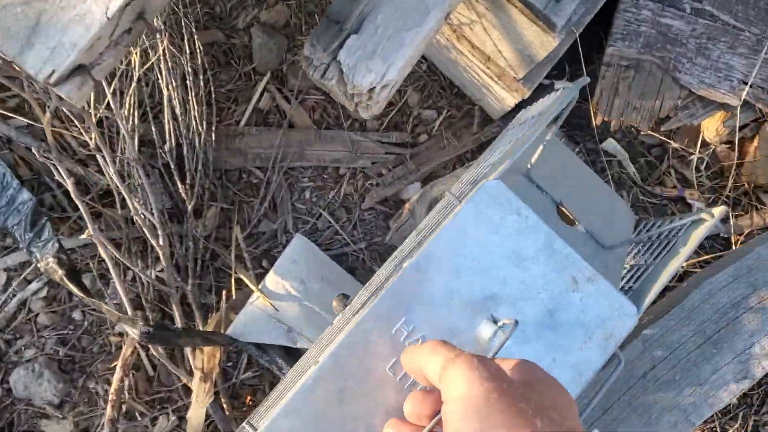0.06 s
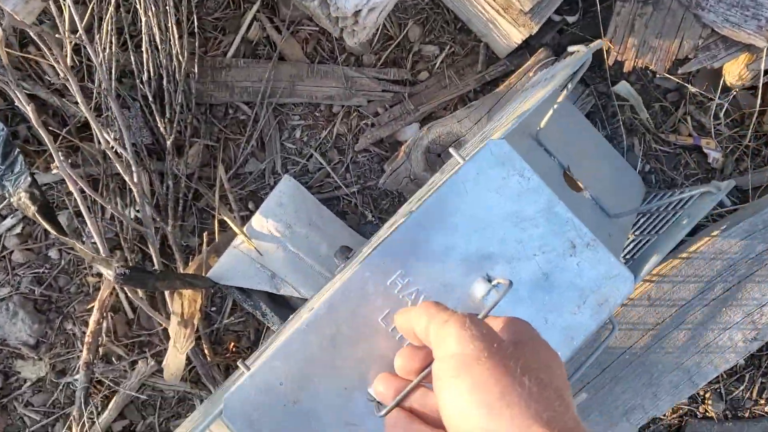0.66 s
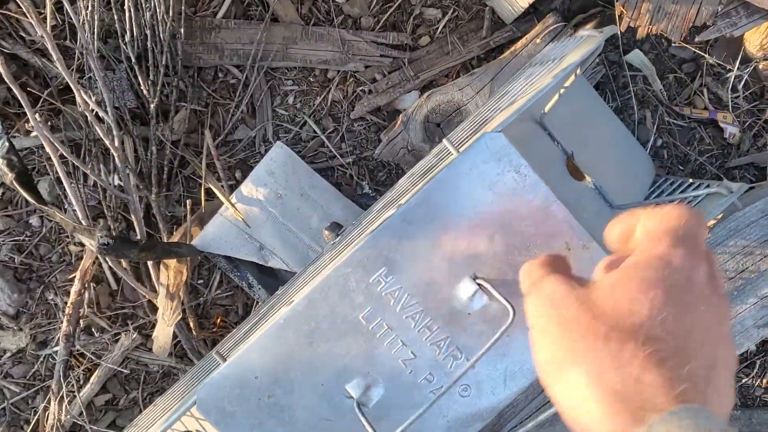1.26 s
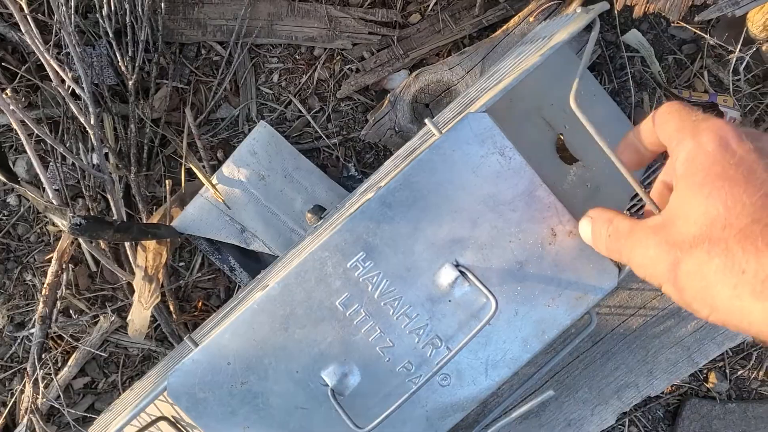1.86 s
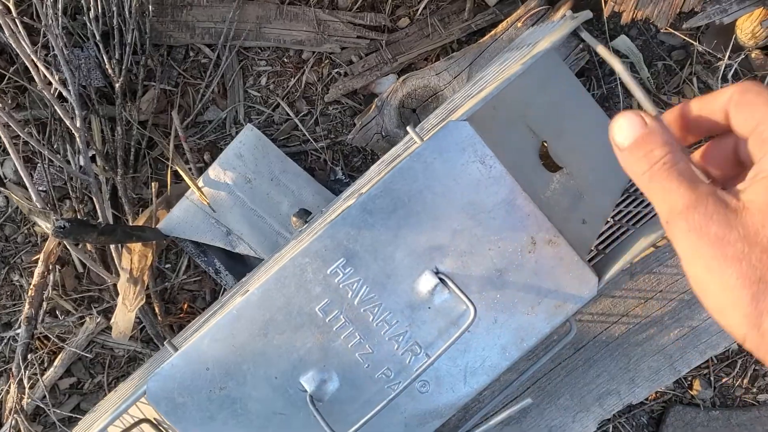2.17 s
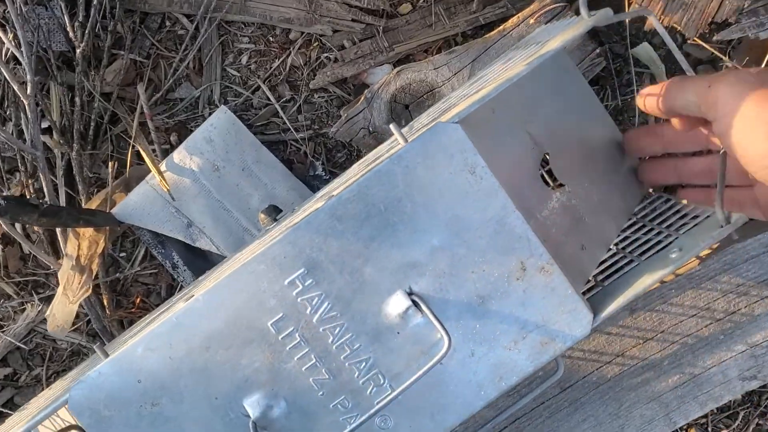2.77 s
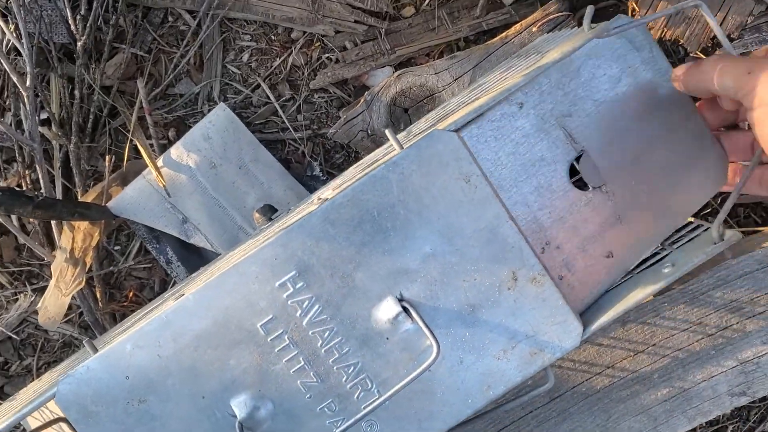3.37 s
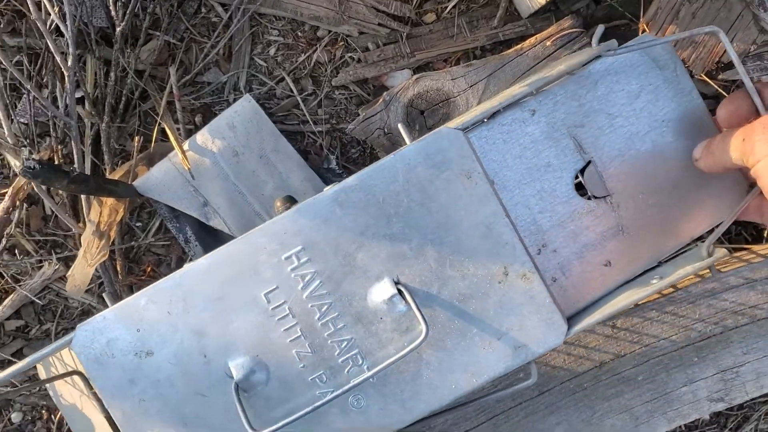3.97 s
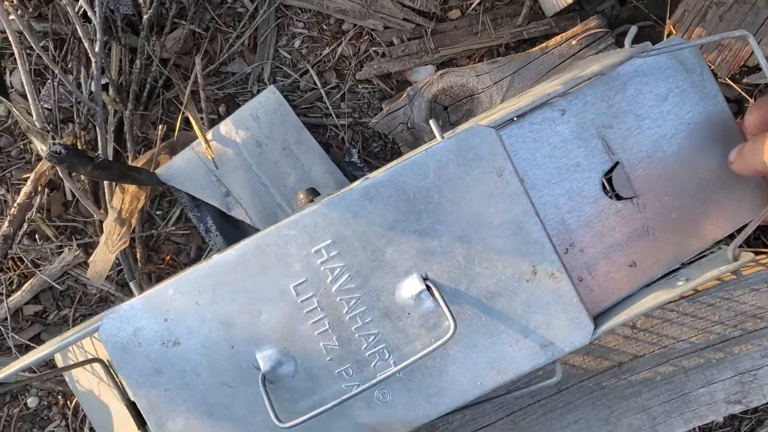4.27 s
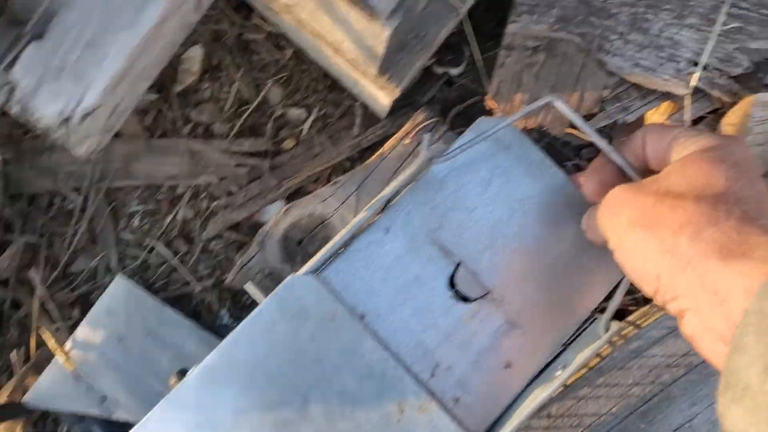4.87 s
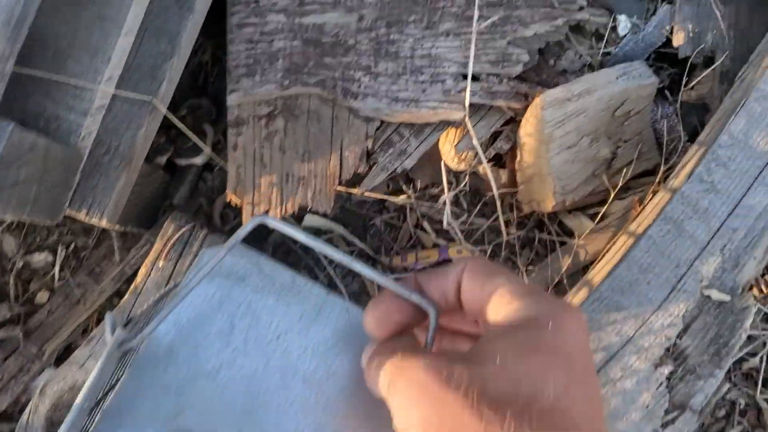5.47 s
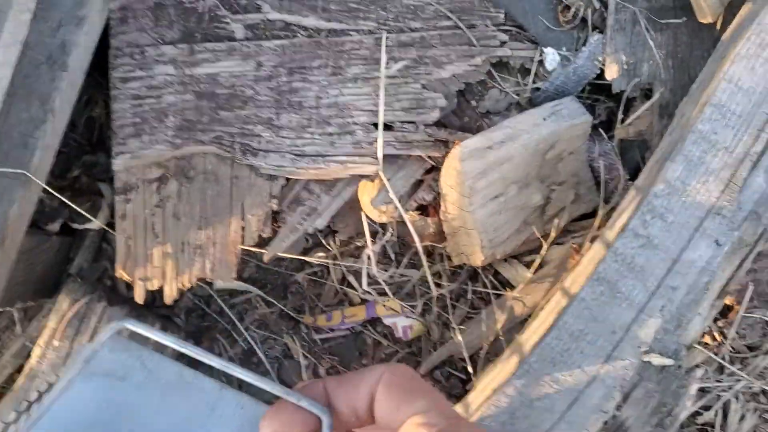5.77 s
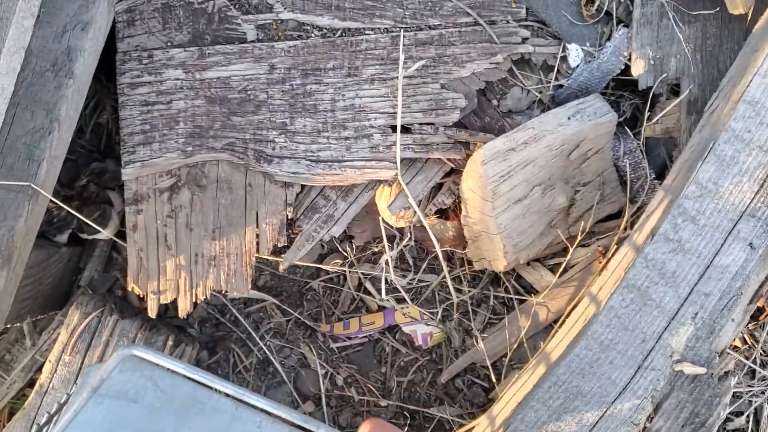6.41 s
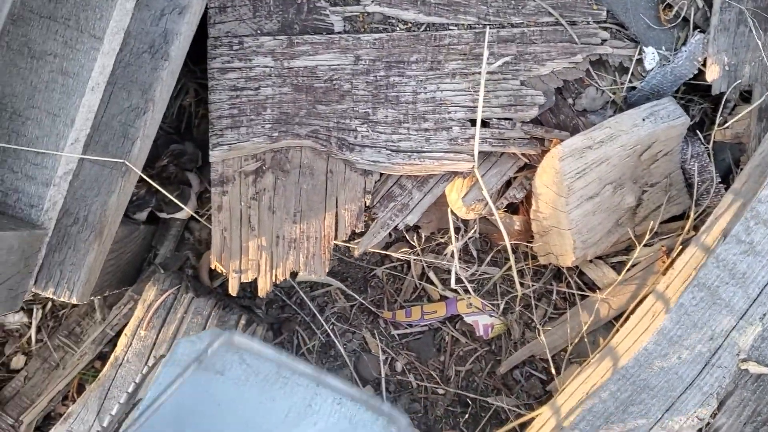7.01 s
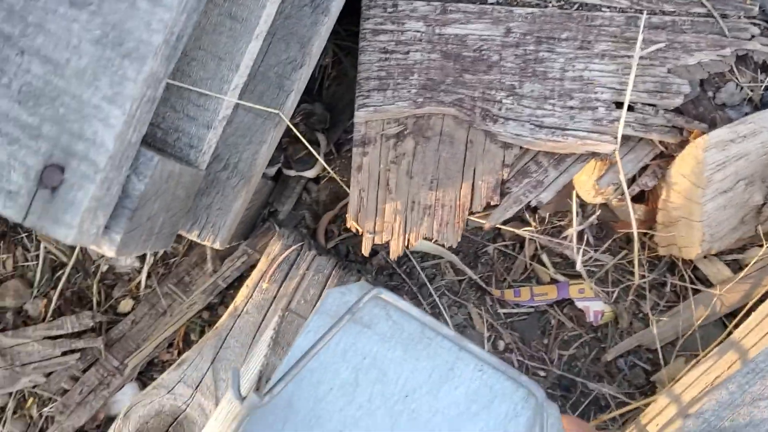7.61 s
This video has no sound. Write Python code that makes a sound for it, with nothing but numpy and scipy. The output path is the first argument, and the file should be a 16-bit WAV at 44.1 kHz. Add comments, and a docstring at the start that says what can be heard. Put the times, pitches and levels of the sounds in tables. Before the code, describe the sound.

Small sheet-metal trap handled outdoors: clinks, taps and wire scrapes, then a brief hinge squeak and a sharp, ringing snap.

```python
"""Outdoors, a phone at arm's length from a galvanized live trap being set by hand, over faint distant rumble.
The carrying handle drops and the sheet-metal box rings. The wire bail knocks, and scrapes by catching and
slipping on the rough zinc; fingers rub along the wire. The door is swung up and latched: near seven seconds
the hinge squeaks and the door snaps, the loudest blow, while a gust buffets the microphone."""
import sys
import numpy as np
from scipy import signal
from scipy.fft import rfft, irfft, next_fast_len
from scipy.io import wavfile

SR = 44100
rng = np.random.default_rng(int(sys.argv[2]) if len(sys.argv) > 2 else 0)


def unload_audio(sound):
    """Save the sound as a 16-bit wav file, at the path given as the first command line argument."""
    columns = np.transpose(np.atleast_2d(sound))
    # keep every value between -1 and 1, then stretch to whole-number steps
    steps = np.round(np.clip(columns, -1, 1) * 32767)
    wavfile.write(sys.argv[1], SR, steps.astype(np.int16))


N = 337365
TIME = np.arange(N) / SR
RING_SIZE = 16384  # samples in one ring of the box
RING_TIME, RING_HZ = np.arange(RING_SIZE) / SR, np.fft.rfftfreq(RING_SIZE, 1 / SR)

# spectrum of the distant rumble: freq_hz, gain_db
RUMBLE_SPECTRUM = [(15, -34.5), (25, -7.5), (64, 6), (117, 2.5), (195, -3.5), (300, -9.5), (420, -5.5),
                   (600, -8), (820, -13.5), (1100, -15.5), (2500, -32.5), (5000, -36.5), (7400, -41.5),
                   (9300, -35), (16000, -43.5)]
# course of the rumble: time_s, level_db
RUMBLE_LEVEL = [(0, -65), (4.5, -59.5), (7.65, -61.5)]
# spectrum of wind on the microphone: freq_hz, gain_db
GUST_SPECTRUM = [(15, -38.5), (25, -15), (52, -1), (88, 0.5), (125, -7), (180, -20.5), (260, -33.5),
                 (400, -33.5), (700, -85)]
# puffs of wind: peak_s, level_db, half_length_s
PUFFS = [(6.074, -48.5, 0.039), (6.858, -36, 0.31), (7.153, -36, 0.16), (7.478, -47, 0.076)]
# fingers rubbing along the wire: start_s, end_s, level_db
FINGER_RUBS = [(1.845, 2.46, -66.5), (4.448, 4.822, -77.5), (5.317, 5.5, -71)]
# spectrum of skin on wire: freq_hz, gain_db
RUB_SPECTRUM = [(2500, -6), (3600, 0), (5200, -3.5), (6700, -1), (7400, -17), (9000, -8), (11000, -28),
                (16000, -3)]
# strokes of metal sliding on metal: start_s, fastest_s, end_s, level_db, hardness_db
STROKES = [(0, 0.05, 0.36, -72, -6), (0.64, 0.87, 0.98, -61, -4), (1.03, 1.06, 1.42, -54, -19),
           (1.6, 1.67, 1.79, -54, -10), (2.37, 2.44, 2.8, -56, -9), (2.72, 2.9, 3.2, -64, -3),
           (3.1, 3.3, 3.6, -58, -2), (3.6, 3.87, 4.2, -53, -11), (4.76, 4.83, 5.08, -57, -18),
           (5.1, 5.35, 5.56, -62, -15), (6.22, 6.85, 7.05, -51, -19), (7.1, 7.21, 7.37, -55, 1),
           (7.33, 7.38, 7.53, -66, -7)]
# spectrum of the dry tick of a zinc grain: freq_hz, gain_db
TICK_SPECTRUM = [(800, -32), (2500, 1), (5500, 1), (7600, -9), (9200, -1), (16000, -6)]
# sharpest snaps of the sliding wire: start_s, level_db
WIRE_SNAPS = [(0.668, -49), (0.69, -52), (0.722, -56), (0.743, -52), (0.77, -60), (2.519, -49),
              (6.875, -45), (6.897, -44), (6.909, -38.5), (7.019, -38)]
# course of the hinge squeak: time_s, pitch_hz, level_db
HINGE_SQUEAK = [(6.965, 888.6, -60), (6.985, 887, -39), (7.003, 804, -35.5), (7.018, 845, -37),
                (7.032, 840, -48)]
# spectrum of the rasp in the hinge: freq_hz, gain_db
RASP_SPECTRUM = [(400, -40), (1100, -6), (2000, -7.5), (4000, -13), (7000, -26.5), (16000, -27)]
# blows that set the bail ringing: start_s, level_db, hardness_db (added to its high modes)
BAIL_BLOWS = [(1.649, -47, -45), (5.239, -57, -26), (5.984, -43, -42), (6.914, -44.5, -30.5),
              (7.036, -26, -1.5)]
# modes of the bail: pitch_hz, gain_db, t60_s
BAIL_TONES = [(1066, -8, .22), (1252, 0, .25), (1916, -17, .25), (2640, -19, .22), (11601, -19, .45),
              (13151, -1, .14), (13385, -13, .17), (14815, -20, .5)]
# the sheet metal's bands (boom, body, clank, sizzle): lower_edge_hz, trim_db, build_up_s, t60_share
BANDS = [(125, -2.5, 0.005, 1.33), (416, -4, 0.006, 1.26), (1620, -4.5, 0.0031, 0.93),
         (5270, -2, 0.002, 0.92)]
# overall voice of the panels: freq_hz, gain_db
PANEL_SPECTRUM = [(130, -6), (205, -4), (300, -2.5), (355, -7), (470, 3.5), (650, 3.5), (1100, 2),
                  (1800, -3), (3400, -4), (5500, -11), (7600, -20.5), (9200, -12.5), (12500, -14.5),
                  (16000, -18.5)]
# panel modes with a set weight: pitch_hz, weight_db
MAIN_MODES = [(160, 0.5), (207, 8.5), (232, -0.5), (462, 6.5), (590, 7.5), (652, 8), (727, 4), (1062, 10.5),
              (1245, 6.5), (1663, 8.5), (2153, -10), (2680, 3), (3030, 4), (3442, 7.5), (4717, -3),
              (9152, 12)]
# the hand holds the door firmly and chokes the ring: start_s, end_s
FIRM_GRIPS = [(2.45, 2.55), (3.3, 3.42), (6.6, 7.0)]
# where the blows lie as the phone turns away from the trap: time_s, left_minus_right_db
TRAP_BEARING = [(0, -1), (6.3, 0.5), (7.0, 1)]
# blows on the trap, with the other bands relative to the body:
# start_s, body_db, boom_db, clank_db, sizzle_db, panel_hz, wire_hz
BLOWS = [(0.227, -53, -3, -12.5, -18.5, 533, 2870), (0.625, -54.5, -6.5, -13, -15.5, 550, 3300),
         (0.666, -74.5, 10, 7, -3, 630, 4670), (0.901, -43, -12.5, -7, -7, 630, 3460),
         (1.071, -32.5, -15, -10, -24.5, 520, 3100), (1.124, -39, -17, -8, -25, 587, 2050),
         (1.142, -38.5, -1, -3.5, -18.5, 462, 3120), (1.168, -30.5, -0.5, -3.5, -18, 554, 3270),
         (1.18, -25.5, -8, -7.5, -22, 605, 2190), (1.198, -33.5, -10, -2, -16, 1090, 3010),
         (1.27, -39, -13, -4.5, -21.5, 510, 3030), (1.295, -45.5, -8, -8, -12, 485, 3070),
         (1.362, -57.5, -5, -10.5, -15, 476, 2990), (1.52, -60.5, 4.5, -19, -17.5, 444, 2940),
         (1.643, -45.5, -5, -14, -11, 1220, 2720), (1.791, -39, -20.5, -6.5, -12.5, 590, 2900),
         (2.185, -48, -30, -16, -30, 610, 3080), (2.2, -53, -25, -0.5, -12, 600, 3600),
         (2.233, -52.5, -5, -10, -17, 620, 2380), (2.461, -37.5, -19, 1.5, -6, 606, 4060),
         (2.485, -41.5, 1, -15, -17, 547, 3430), (2.513, -48, -1, -2, -11, 460, 4100),
         (2.599, -45.5, -22, -7, -20, 630, 3300), (2.641, -42.5, -12.5, -3.5, -16.5, 630, 4000),
         (3.133, -37.5, -6.5, -14, -29, 624, 2630), (3.341, -33, -5, 4.5, -11.5, 1060, 3060),
         (3.353, -31.5, -5.5, -1, -11.5, 1060, 3330), (3.381, -34.5, -18, -1, -17.5, 730, 2950),
         (3.44, -45, -20, 0.5, -14.5, 640, 3230), (3.51, -44, -17, -7.5, -12.5, 636, 3850),
         (3.741, -35, -18, 2, -2, 603, 2690), (3.785, -22.5, -10.5, -1, -3, 764, 3870),
         (3.795, -27.5, -8.5, 2.5, -3, 598, 2670), (3.832, -36, -2, 0, -3.5, 640, 2760),
         (3.91, -40.5, -4.5, 4.5, -1, 507, 2850), (3.934, -39, -6, 2, -8, 475, 2720),
         (3.954, -35.5, -12, -3.5, -6.5, 590, 2880), (4.156, -48.5, -17.5, -14, -29, 586, 2670),
         (4.833, -44, 0.5, -14, -15.5, 582, 2040), (4.85, -42, -10.5, -7.5, -15.5, 627, 1890),
         (5.047, -51.5, -5.5, -5, -16, 1054, 2800), (5.235, -45.5, -11, -18, -24.5, 640, 1920),
         (5.462, -51, -10, -7.5, -14.5, 525, 2500), (5.671, -50.5, -8, -3.5, -16, 655, 3840),
         (5.798, -51, -2.5, -6, -17.5, 805, 4730), (5.981, -42.5, -7, -9.5, -27, 1240, 2710),
         (6.221, -47.5, -16.5, -7, -16, 654, 4500), (6.388, -43, -5, -1.5, -8.5, 813, 3900),
         (6.473, -48.5, -8, -3.5, -6, 584, 3370), (6.558, -46.5, -1, -2, -23, 664, 3900),
         (6.628, -38, -11, 3, -13.5, 810, 4280), (6.76, -40, -5, 3, -10.5, 423, 3670),
         (6.892, -37, -8, -9.5, -10.5, 756, 3400), (6.913, -38, -7, -4.5, -13, 1070, 2260),
         (7.036, -17.5, -17.5, -1, -2.5, 1235, 3960), (7.045, -28.5, -7.5, 5, 3, 1250, 2110),
         (7.089, -47.5, 4.5, 8.5, 7.5, 620, 4300), (7.193, -42.5, -19, 2, -1.5, 715, 3820),
         (7.205, -41, -17, 5.5, 3, 636, 3400), (7.263, -43, -32, 1, -0.5, 640, 4370),
         (7.333, -51, -7, -2, -2.5, 1040, 3450)]


def undb(db):
    """Decibels to gain."""
    return np.exp(np.asarray(db) * (np.log(10) / 20))


def unit(x):
    """Scale to rms 1."""
    return x / np.sqrt(np.mean(x ** 2))


def curves(table):
    """Each column of a table, joined by straight lines in time."""
    times, *columns = np.transpose(table)
    return [np.interp(TIME, times, column) for column in columns]


def colour(spectrum, hz):
    """Gain of a spectrum table at the given frequencies."""
    freq_hz, gain_db = np.transpose(spectrum)
    return undb(np.interp(np.log(hz + 1), np.log(freq_hz), gain_db))


def noise(spectrum):
    """Noise shaped by a spectrum table, rms 1."""
    size = next_fast_len(N)
    shaped = rfft(rng.standard_normal(size)) * colour(spectrum, np.fft.rfftfreq(size, 1 / SR))
    return unit(irfft(shaped, size)[:N])


def wander(rate_hz):
    """Slow random drift around zero."""
    knots = rng.standard_normal(1024)
    return 0.85 * np.interp(TIME * rate_hz, np.arange(len(knots)), knots)


def pan(db):
    """Left and right gains for a level difference."""
    return undb(np.array([db, -db]).reshape(2, -1) / 2)


def add(out, start_s, sound):
    """Mix a sound in at start_s."""
    start = max(int(start_s * SR), 0)
    out[:, start:start + sound.shape[1]] += sound[:, :N - start]


def distant_rumble(side_db=-9, swell_db=1.0):
    """Far-off outdoor rumble, slowly swelling, mostly alike at both microphones."""
    level_db, = curves(RUMBLE_LEVEL)
    mid = noise(RUMBLE_SPECTRUM) * undb(swell_db * wander(4.2))
    side = noise(RUMBLE_SPECTRUM) * undb(side_db)
    return np.array([mid + side, mid - side]) * undb(level_db)


def gust(flutter_db=3, pan_db=-5):
    """Puffs swell and die; their eddies hit each microphone port on its own, the right one harder."""
    strength = sum(undb(db) * np.exp(-((TIME - peak_s) / half_s) ** 2) for peak_s, db, half_s in PUFFS)
    ports = np.array([noise(GUST_SPECTRUM) * undb(flutter_db * wander(16)) for _ in range(2)])
    return ports * strength * pan(pan_db)


def finger_rubs(grain_db=2):
    """Skin slides on the wire: a thin, grainy hiss that swells and fades."""
    speed = sum(undb(db) * np.sin(np.pi * np.clip((TIME - start) / (end - start), 0, 1))
                for start, end, db in FINGER_RUBS)
    hiss = np.array([noise(RUB_SPECTRUM), noise(RUB_SPECTRUM)])
    return hiss * speed * undb(grain_db * wander(68))


def stroke_gains(fade_s=0.017, swell_db=8.5, sink_db=12, hardness_share=0.46):
    """Body, clank and sizzle gains: a stroke grows to its fastest moment, then sinks as the hand slows."""
    gains = np.zeros((3, N))
    for start, fastest, end, db, hardness_db in STROKES:
        edge = np.clip(np.minimum(TIME - start, end - TIME) / fade_s, 0, 1)
        speed = edge * undb(np.interp(TIME, [start, fastest, end], [-swell_db, 0, -sink_db]))
        clank_db = db - 1 + hardness_share * hardness_db
        gains += np.outer(undb([db, clank_db, db + hardness_db]), speed)
    return gains


def zinc_ticks(per_s=32, tick_s=0.0016, gain_db=7, spread_db=4, side_db=-5):
    """Single rough grains snap off the sliding contact, too light to ring the panels."""
    *_, sizzle = stroke_gains()
    snaps = (rng.random(N) < per_s / SR) * sizzle
    snaps *= undb(gain_db + spread_db * np.clip(rng.standard_normal(N), -2, 2))
    for start_s, db in WIRE_SNAPS:
        snaps[int(start_s * SR)] += undb(db)
    decays = signal.lfilter([1], [1, -np.exp(-1 / (tick_s * SR))], snaps)
    mid, side = noise(TICK_SPECTRUM), noise(TICK_SPECTRUM) * undb(side_db)
    return np.array([mid + side, mid - side]) * decays


def hinge_squeak(overtone_db=-16, waver=0.035, rasp_db=-7):
    """Regular stick-slip in the hinge: a short wavering tone, with a rasp once a cycle."""
    pitch_hz, level_db = curves(HINGE_SQUEAK)
    phase = 2 * np.pi * np.cumsum(pitch_hz * (1 + waver * wander(130))) / SR
    tone = sum(undb(overtone_db * k) * np.sin((k + 1) * phase) for k in range(3))
    rasp = noise(RASP_SPECTRUM) * (1 + np.cos(phase)) / 2
    sounding = (TIME > HINGE_SQUEAK[0][0]) & (TIME < HINGE_SQUEAK[-1][0])
    return sounding * undb(level_db) * (tone + undb(rasp_db) * rasp)


def bail_ring(high_hz=6000):
    """The steel rod rings with a few clean tones; only a hard blow wakes the high ones."""
    out = np.zeros((2, N))
    for start_s, db, hardness_db in BAIL_BLOWS:
        for hz, mode_db, t60_s in BAIL_TONES:
            mic_phases = 2 * np.pi * rng.random() + min(hz / 2500, 2) * rng.standard_normal((2, 1))
            fade = undb(db + mode_db + hardness_db * (hz > high_hz) - 60 * RING_TIME / t60_s)
            add(out, start_s, fade * np.sin(2 * np.pi * hz * RING_TIME + mic_phases))
    return out


def panel_modes(spacing_hz=15, between_db=-12, half_lead_s=0.00004):
    """Mode weights by band, microphone and frequency; a thin plate has about equally many per hertz."""
    is_mode = rng.random(len(RING_HZ)) < RING_HZ[1] / spacing_hz
    weight = np.where(is_mode, 1., undb(between_db))
    for hz, db in MAIN_MODES:
        weight[int(round(hz / RING_HZ[1]))] = undb(db - 0.5)
    # short waves leave from all over the box and reach the microphones out of step; the right is nearer
    scatter_rad = np.minimum(RING_HZ / 2000, 1) ** 1.5
    skew_rad = scatter_rad * rng.standard_normal(len(RING_HZ)) - np.pi * RING_HZ * half_lead_s
    mic_phases = np.exp(1j * np.array([skew_rad, -skew_rad]))
    highpasses = [1 / (1 + (edge_hz / (RING_HZ + 1)) ** 12) for edge_hz, *_ in BANDS]
    bandpasses = -np.diff(highpasses, axis=0, append=0)
    return bandpasses[:, None] * weight * colour(PANEL_SPECTRUM, RING_HZ) * mic_phases


def favour(hz, width, db):
    """Extra weight for the modes around one note; width is a share of its frequency."""
    return 1 + (undb(db) - 1) / (1 + ((RING_HZ / hz - 1) / width) ** 2)


def box_ring(modes, t60_s, notes, uneven_db=3.5, cluster_db=1.5, cluster_hz=170):
    """The ring of one contact point, by band: each spot weights single modes and clusters its own way."""
    single, cluster = rng.standard_normal((2, len(RING_HZ)))
    cluster = np.interp(RING_HZ / cluster_hz, np.arange(len(cluster)), cluster)
    spot = notes * undb(uneven_db * single + cluster_db * cluster)
    phases = np.exp(2j * np.pi * rng.random(len(RING_HZ)))
    waves = irfft(modes * spot * phases)
    onset = waves[..., :SR // 20].mean(axis=1)
    waves /= np.sqrt(np.mean(onset ** 2, axis=1))[:, None, None]
    _, trim_db, build_up_s, t60_share = np.transpose(BANDS)[..., None]
    rise = 1 - np.exp(-RING_TIME / build_up_s)
    fade = undb(trim_db - 60 * RING_TIME / (t60_s * t60_share))
    return waves * (rise * fade)[:, None]


def scrapes(modes, slips_per_s=380, t60_s=0.21, door_hz=600, tick_s=0.0013, spots=26):
    """Wire and door catch and slip on rough zinc, each slip a tiny blow, creeping from spot to spot."""
    body, clank, sizzle = stroke_gains()
    band_gains = [body * undb(-7), body * undb(-1), clank * undb(-1), sizzle * undb(1)]
    sizes = undb(4.2 * np.minimum(rng.exponential(size=N), 4.2))
    slips = (rng.random(N) < slips_per_s / SR) * sizes * np.sign(rng.standard_normal(N))
    door_note = favour(door_hz, width=0.04, db=7)
    tick = 1 + 3 * np.exp(-RING_TIME / tick_s)
    sound = np.zeros((len(BANDS) * 2, N))  # a row for each band at each microphone
    for stretch in np.array_split(np.arange(N), spots):
        ring = box_ring(modes, t60_s, door_note) * tick
        ring = ring.reshape(len(sound), -1)[:, :RING_SIZE // 2]
        add(sound, stretch[0] / SR, signal.fftconvolve(slips[None, stretch], ring, axes=1))
    return sum(unit(band) * gain for band, gain in zip(sound.reshape(-1, 2, N), band_gains))


def soft_contact(gap_db, wire_hz, edge_hz=4800, level_gap_db=-6):
    """A soft contact cannot drive the top of the clank; the gap from clank to sizzle sets the treble."""
    edge_hz = max(edge_hz, 1.2 * wire_hz)  # the wire's own note always gets through
    top = 1 - 1 / (1 + (RING_HZ / edge_hz) ** 16)
    return undb(top * 0.76 * (gap_db - level_gap_db))


def ring_time(start_s, db, medium_t60_s=0.26, medium_db=-42, halvings_per_db=0.0561, grip_share=0.64):
    """The harder the sheet is driven, the faster it loses its energy; a firm hand chokes it further."""
    held = any(start < start_s < end for start, end in FIRM_GRIPS)
    return medium_t60_s * 2 ** (halvings_per_db * (medium_db - db)) * (grip_share if held else 1)


def knocks(modes, contact_s=0.0011, crack_s=0.0083, dent_s=0.0043):
    """Each blow dents the sheet and cracks, the more so the harder the contact; then the box rings on."""
    out = np.zeros((2, N))
    push = 1 - np.exp(-RING_TIME / contact_s)  # the touch loads the sheet gradually
    for start_s, body_db, boom_db, clank_db, sizzle_db, panel_hz, wire_hz in BLOWS:
        notes = favour(panel_hz, width=0.085, db=6) * favour(wire_hz, width=0.05, db=9)
        notes *= soft_contact(sizzle_db - clank_db, wire_hz)
        bands = box_ring(modes, ring_time(start_s, body_db), notes)
        ring = sum(band * undb(db) for band, db in zip(bands, [boom_db, 0, clank_db, sizzle_db]))
        crack = 1 + 1.87 * undb(0.37 * sizzle_db - 2) * np.exp(-RING_TIME / crack_s)
        dent = np.sin(2 * np.pi * panel_hz * RING_TIME) * np.exp(-RING_TIME / dent_s)
        add(out, start_s, (ring * crack + dent) * push * undb(body_db))
    return out * pan(*curves(TRAP_BEARING))


def scene():
    """The trap at arm's length in the open air, with no walls to echo it."""
    modes = panel_modes()
    trap = knocks(modes) + scrapes(modes) + zinc_ticks() + finger_rubs() + bail_ring() + hinge_squeak()
    return trap + gust() + distant_rumble()


def record(dry):
    """The phone cuts the treble above 16 kHz."""
    return signal.sosfilt(signal.ellip(10, .2, 70, 16000, fs=SR, output="sos"), dry)


dry = scene()
out = record(dry)
unload_audio(out)
```